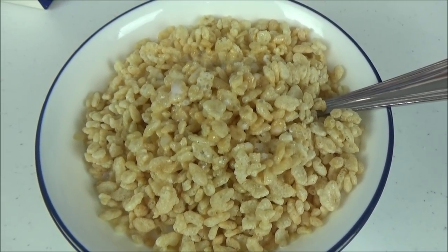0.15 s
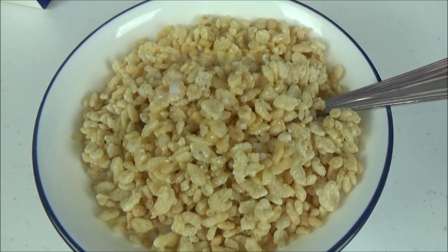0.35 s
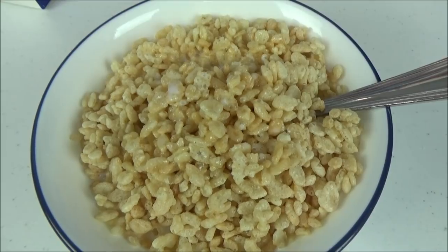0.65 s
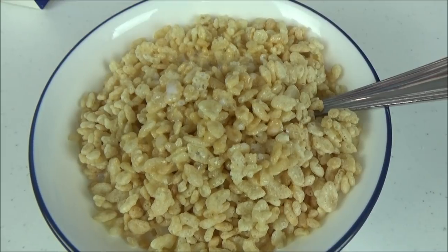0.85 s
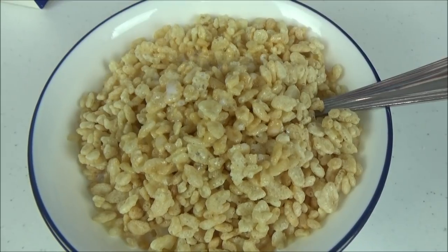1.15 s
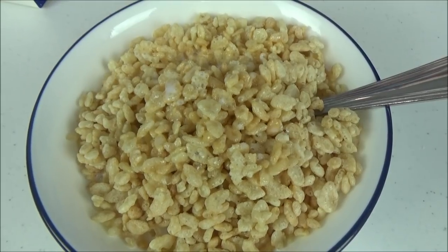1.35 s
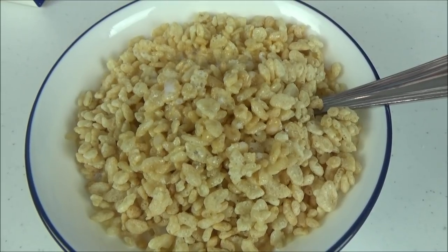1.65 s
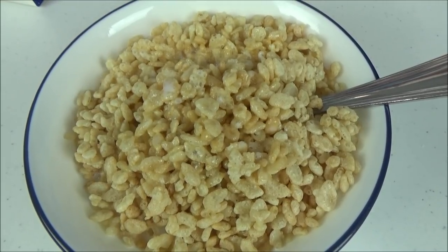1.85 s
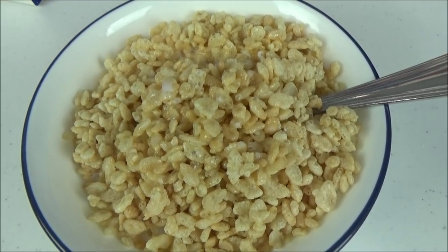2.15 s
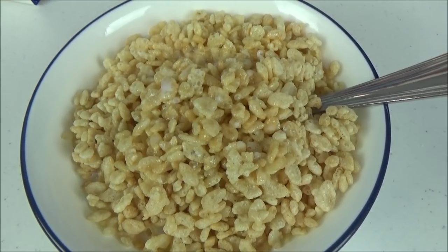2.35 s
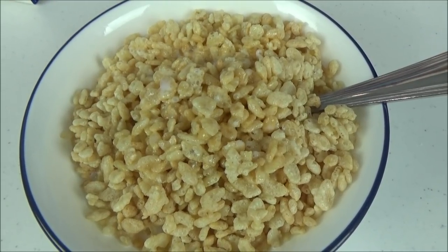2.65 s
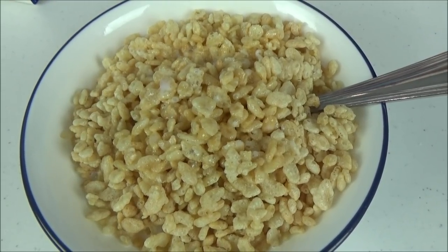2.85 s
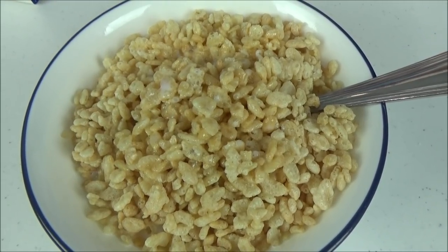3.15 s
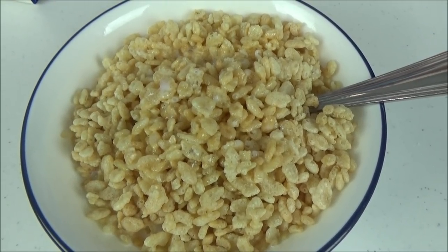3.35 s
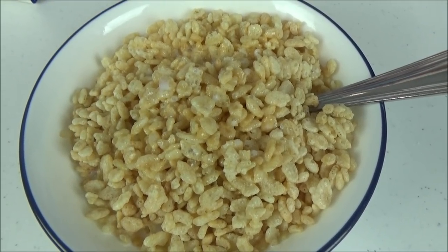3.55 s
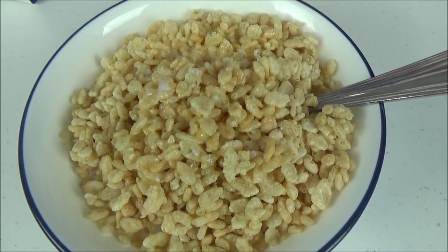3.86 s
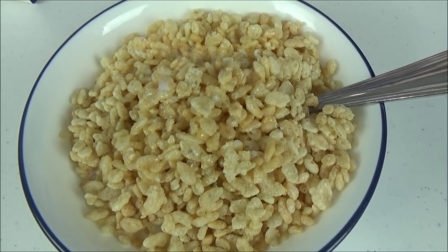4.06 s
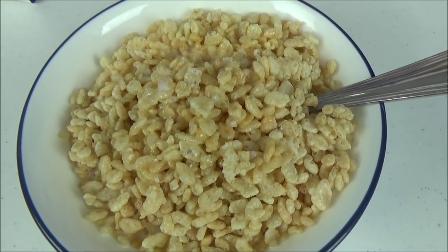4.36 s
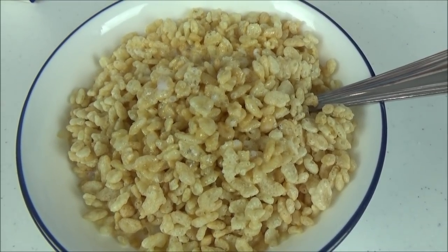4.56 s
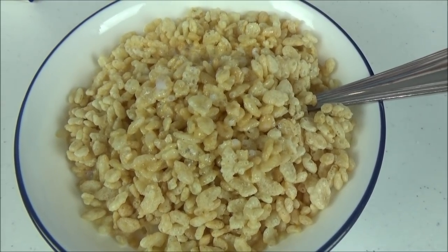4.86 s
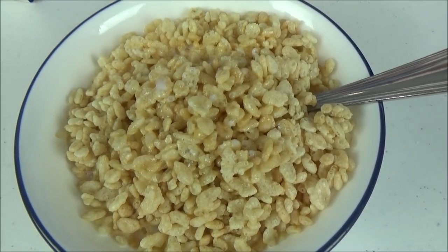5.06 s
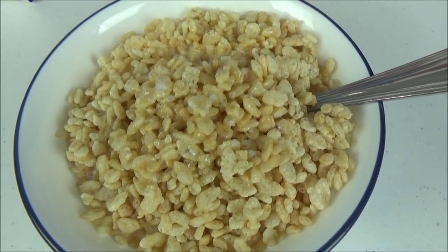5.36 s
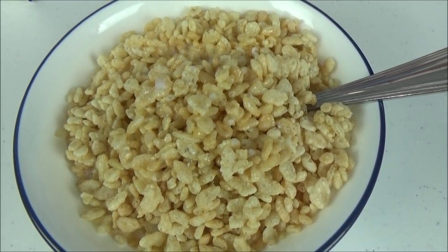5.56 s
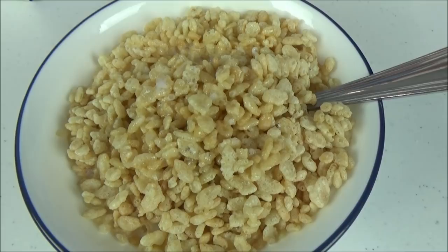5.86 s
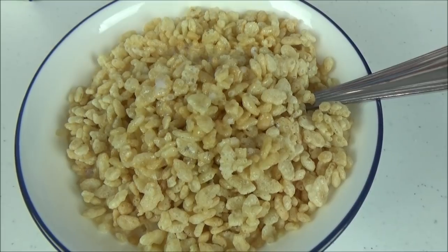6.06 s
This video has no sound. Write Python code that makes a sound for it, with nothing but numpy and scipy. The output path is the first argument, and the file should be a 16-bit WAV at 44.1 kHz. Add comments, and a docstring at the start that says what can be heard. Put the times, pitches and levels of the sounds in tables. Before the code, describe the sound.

Puffed cereal soaking in milk crackles very close by, bright irregular snaps and duller pops over a fine fizz and quiet room hum.

```python
"""A faint fizz over quiet room hum, then snaps and pops: a bowl of puffed cereal soaks in milk, close by.
Cell walls crack with bright snaps, freed air pockets give duller pops, and countless faint cracks fizz below.
A sizzle, a few ringing bubbles, a low thud and wet clunks are sums of short decaying modes or shaped noise.
Scatter spreads each crack, a wall echo and faint tail follow, and shaped noise with hum lines makes the room.
The recorder ducks at the loudest cracks and recovers slowly."""
import sys
import numpy as np
from scipy import signal
from scipy.fft import rfft, irfft
from scipy.io import wavfile
from scipy.ndimage import uniform_filter1d

SR = 44100
rng = np.random.default_rng(int(sys.argv[2]) if len(sys.argv) > 2 else 0)


def transcribe(signal):
    """Save signal, clipped to [-1, 1], as a 16-bit WAV file at the path in sys.argv[1]."""
    frames = np.atleast_2d(signal).T
    limited = np.clip(frames, -1, 1)
    pcm = np.round(limited * 32767).astype(np.int16)
    wavfile.write(sys.argv[1], SR, pcm)


N = 273111


def from_db(db):
    """Decibels to amplitude."""
    return 10 ** (np.asarray(db) / 20)


def rms_one(x):
    """Scale to an RMS of 1."""
    return x / np.sqrt(np.mean(x ** 2) + 1e-20)


def at_hz(points, hz):
    """Read a spectrum curve, straight between its points on a log frequency axis."""
    point_hz, point_db = np.transpose(points)
    return np.interp(np.log(hz + 1), np.log(point_hz), point_db)


def drift(rate_hz):
    """Random wavering with RMS 1, slow or rough by its rate: noise through two equal one-pole lowpasses."""
    r = np.exp(-2 * np.pi * rate_hz / SR)
    noise = rng.standard_normal(N + SR)
    settled = signal.lfilter([1], [1, -2 * r, r * r], noise)[SR:]
    return rms_one(settled)


def room():
    """Broad noise from rumble into hiss, wide in the middle range, with wavering hum lines."""
    # background noise spectrum, ending sharply near 16 kHz, relative: hz, level_db_per_hz
    room_curve = [(24, -10.5), (124, 1.5), (334, -4), (800, -8.5), (920, -7.5), (1370, -11), (4000, -15),
                  (9000, -15), (13000, -22), (15700, -21.5), (16200, -47)]
    # stereo width of the noise: hz, side_minus_mid_db
    width_curve = [(100, -18), (400, -4), (1100, 0.5), (8000, -7)]
    # hum lines: line_hz, centre_level_db_rms, waver_rate_hz
    hum_lines = [(59, -75.5, 4.6), (118.9, -72.5, 5.9), (335.2, -73.5, 3.8)]
    noise_db_rms = -58

    hz = np.arange(N // 2 + 1) * SR / N
    mid, side = rfft(rng.standard_normal((2, N))) * from_db(at_hz(room_curve, hz))
    mid = irfft(mid, N)
    side = irfft(side * from_db(at_hz(width_curve, hz)), N)
    sound = from_db(noise_db_rms) * rms_one(mid + side * [[1], [-1]])
    t = np.arange(N) / SR
    for line_hz, level_db, waver_hz in hum_lines:
        level = np.sqrt(2) * from_db(level_db + 2.1 * drift(waver_hz))
        sound = sound + level * np.sin(2 * np.pi * line_hz * t + 1.06 * drift(waver_hz))
    return sound


def cracks(rows, rise_ms, unlike, low_hz, count, size, scatter_db=-26.0, rise_per_ms=0, ragged=1):
    """Each crack rings a few modes of its own grain for a moment; the heap and bowl around it scatter the sound.

    rows: start_s, peak_db before echoes and ducking, centre_hz, ring_ms, spread_octaves each way.
    unlike: how far left and right scatter differ; ragged: largest random start phase in turns.
    """
    top_hz = 14040   # treble rolls off above this
    start_s, peak_db, hz, ring_ms, octaves = np.transpose(rows)
    ms = np.arange(size) * 1000 / SR

    chance = rng.random((len(start_s), 2, count))
    steps = 2 * (np.arange(count) + chance[:, 0]) / count - 1   # modes cover the spread evenly
    modes_hz = np.clip(hz[:, None] * 2 ** (octaves[:, None] * steps), 50, SR / 2.5)
    turns = modes_hz[..., None] * ms * (1 + rise_per_ms * ms) / 1000   # pitch climbs at twice rise_per_ms
    start_turns = ragged * chance[:, 1, :, None]   # a clean break starts all modes in step
    rings = np.sin(2 * np.pi * (turns + start_turns))
    wave = (rings * from_db(-7 * steps ** 2)[..., None]).sum(axis=1)   # strongest near the centre
    wave = wave * (1 - np.exp(-ms / rise_ms)) * np.exp(-ms / ring_ms[:, None])

    paths = rng.standard_normal((len(start_s), 3, size))   # one shared path, then left and right
    scatter = from_db(scatter_db - 4.36 * ms) * (ms > .2) * (paths[:, :1] + unlike * paths[:, 1:])
    # the direct sound sits a little left or right
    scatter[..., 0] = from_db(1.2 * paths[:, :1, 0] * [1, -1] / 2)
    heard = signal.fftconvolve(wave[:, None], scatter, axes=2)[..., :size]
    band = signal.butter(2, [low_hz, top_hz], "band", fs=SR, output="sos")
    heard = signal.sosfilt(band, heard)   # small things radiate no bass
    heard = heard * (from_db(peak_db) / np.abs(heard).max(axis=(1, 2)))[:, None, None]

    at = (np.round(start_s * SR).astype(int)[:, None] + np.arange(size)).ravel()
    return np.array([np.bincount(at, heard[:, side].ravel(), N + SR)[:N] for side in range(2)])


def chance_rows(count, mean_db, spread_db, top_db, hz, octaves, ring_ms, swell_db):
    """Cracks at random moments: in clumps of four, many faint, few strong, louder while the fizz swells."""
    clump_s = 0.012   # small cracks set each other off within about this time
    u, g = rng.random((count, 2)), rng.standard_normal((count, 3))
    clumps = rng.random(count // 4)[np.arange(count) % (count // 4)]
    start_s = (clumps * N / SR - clump_s * np.log(1 - u[:, 0])) % (N / SR)
    level_db = mean_db - spread_db * np.log(1 - u[:, 1]) + swell_db[(start_s * SR).astype(int)]
    pitch_hz = hz * 2 ** (octaves * g[:, 0])
    rings_ms = ring_ms * 2 ** (0.44 * g[:, 1])
    spread_octaves = 0.45 * 2 ** (0.69 * g[:, 2])
    return np.transpose([start_s, np.minimum(level_db, top_db), pitch_hz, rings_ms, spread_octaves])


def fizz():
    """Small cracks come in clumps, most of them bright, a few dull."""
    # vigour of the fizz, a base for the crack levels: time_s, level_db
    vigour = [(0.0, -55.5), (0.64, -60.5), (1.36, -59), (1.83, -59), (1.95, -59.5), (3.05, -57),
              (4.0, -62.5), (4.36, -56), (5.1, -64), (5.35, -69), (5.8, -55)]
    swell_db = np.interp(np.arange(N) / SR, *np.transpose(vigour)) + 4.5 * drift(14)
    bright = chance_rows(count=2000, mean_db=5.5, spread_db=5.0, top_db=-36.5, hz=9100, octaves=0.27,
                         ring_ms=0.4, swell_db=swell_db)
    dull = chance_rows(count=240, mean_db=11.5, spread_db=6.0, top_db=-46.5, hz=2740, octaves=0.43,
                       ring_ms=0.46, swell_db=swell_db)
    bright = cracks(bright, rise_ms=0.064, unlike=0.15, low_hz=298, count=6, size=200)
    dull = cracks(dull, rise_ms=0.11, unlike=0.35, low_hz=304, count=3, size=160)
    return bright + dull


def pops():
    """Air pockets open: duller cracks whose modes lie closer together the fainter they are."""
    # air pockets opening: start_s, peak_db, centre_hz, ring_ms
    pop_rows = [(0.0134, -40, 2150, 0.86), (0.0296, -32.5, 2200, 0.69), (0.047, -23.5, 2280, 2.2),
                (0.2497, -42, 2250, 1.3), (0.4682, -38, 2020, 0.87), (0.7455, -31, 2530, 0.32),
                (1.207, -36, 2650, 0.24), (1.459, -37.5, 1980, 0.46), (1.6414, -31, 2400, 0.35),
                (1.8585, -33, 2420, 0.94), (1.927, -32, 1860, 0.14), (2.345, -33.5, 2030, 0.36),
                (2.5794, -29, 3540, 0.11), (3.1795, -19, 1980, 0.11), (3.301, -42, 1560, 0.19),
                (3.3302, -27.5, 2500, 0.19), (3.6027, -16, 2320, 0.24), (3.708, -38, 2300, 0.37),
                (3.821, -40.5, 2030, 1), (4.1378, -34.5, 2120, 0.41), (4.4244, -28, 2120, 0.081),
                (4.516, -37.5, 2570, 0.17), (4.6216, -19.5, 2480, 0.074), (4.8751, -37.5, 2100, 0.4),
                (4.966, -29, 2350, 0.53), (5.0424, -23, 2430, 1.4), (5.1348, -37.5, 2050, 0.34),
                (5.808, -30, 2310, 0.9), (6.0874, -41.5, 3970, 0.5)]
    octaves, doubles_db = 0.6, 22   # mode spread of a 0 dB pop; it doubles per this many dB
    rows = [(s, db, hz, ring, octaves * 2 ** (db / doubles_db)) for s, db, hz, ring in pop_rows]
    return cracks(rows, rise_ms=0.14, unlike=1.13, low_hz=278, count=14, size=800, ragged=0.25)


def snaps():
    """Cell walls break: bright, near-clean cracks that tend to ring longer when fainter."""
    # loud cracks of cell walls: start_s, peak_db, centre_hz
    snap_rows = [(0.0292, -32, 8150), (0.047, -1.5, 8150), (0.284, -18, 9650), (0.294, -18.5, 9300),
                 (0.3458, -26.5, 10800), (0.397, -29, 6200), (0.46, -18.5, 7080), (0.4675, -30.5, 6700),
                 (0.8476, -25, 9200), (0.896, -34, 8630), (0.9063, -30.5, 7200), (1.074, -31.5, 8280),
                 (1.0793, -34.5, 8050), (1.207, -19, 8200), (1.2405, -26.5, 8100), (1.328, -24.5, 10700),
                 (1.3545, -26, 9000), (1.3589, -17.5, 10160), (1.3722, -21, 7200), (1.452, -22.5, 8750),
                 (1.4593, -21.5, 5170), (1.633, -23.5, 9500), (1.6405, -25, 6630), (1.666, -23, 9000),
                 (1.6896, -37, 8830), (1.7744, -37, 9050), (1.838, -28, 8100), (1.8595, 1, 9700),
                 (1.9879, -23, 8070), (2.1938, -30, 11100), (2.257, -16, 9400), (2.5179, -25.5, 10600),
                 (2.579, -26.5, 6100), (2.6457, -24, 10400), (2.6867, -31.5, 6900), (2.938, -23, 8950),
                 (2.956, -28, 7600), (3.0567, -28, 5870), (3.0686, -28.5, 7300), (3.083, -27, 7900),
                 (3.1808, -22.5, 7000), (3.2642, -27.5, 8600), (3.378, -26, 7300), (3.421, -20, 7400),
                 (3.4325, -23.5, 9500), (3.583, -23.5, 6630), (3.6026, -6, 9100), (3.676, -20, 8740),
                 (3.6874, -26, 8400), (3.8209, -30, 6100), (3.841, -28.5, 8500), (3.9378, -18.5, 11700),
                 (4.1671, -27, 8300), (4.2047, -25.5, 10600), (4.244, -19, 9200), (4.266, -26.5, 8340),
                 (4.2848, -21, 8100), (4.4074, -38, 7360), (4.4247, -8.5, 11240), (4.435, -26, 10200),
                 (4.4505, -24, 7160), (4.6216, -14.5, 10350), (4.6806, -20.5, 7100), (4.7846, -26.5, 8250),
                 (4.814, -33.5, 8900), (4.877, -31, 7840), (4.898, -30.5, 7160), (4.966, -1, 9740),
                 (5.0132, -29.5, 11400), (5.0424, -7.5, 7900), (5.1103, -28, 8700), (5.1351, -27.5, 8000),
                 (5.1927, -28, 9000), (5.372, -30, 10200), (5.4528, -29.5, 6560), (5.4944, -31, 9700),
                 (5.558, -25.5, 8630), (5.6518, -20.5, 9400), (5.6993, -26.5, 7460), (5.808, -7.5, 8750),
                 (5.8747, -26, 8180), (5.9763, -29.5, 7100), (5.989, -35, 9540), (6.008, -27.5, 8100),
                 (6.179, -15, 8550)]
    ring_ms, halves_db = 0.17, 60   # typical ring of a 0 dB snap; it halves per this many dB upward
    octaves, ring_scatter = 0.2, 0.3   # spread of modes; chance in the ring, in doublings
    peak_db = np.array(snap_rows)[:, 1]
    doublings = ring_scatter * rng.standard_normal(len(snap_rows)) - peak_db / halves_db
    rows = [(*row, ring, octaves) for row, ring in zip(snap_rows, ring_ms * 2 ** doublings)]
    return cracks(rows, rise_ms=0.026, unlike=0.86, low_hz=3120, count=10, size=400, ragged=0.085)


def sizzle():
    """Air escapes from one grain: a short rough hiss that swells and fades."""
    # hiss band: its low and high edge [Hz]
    band_hz = [7600, 10200]
    start_s, length_s, level_db = 0.789, 0.09, -52.5   # level before swell and roughness
    phase = np.clip((np.arange(N) / SR - start_s) / length_s, 0, 1)
    band = signal.butter(2, band_hz, "band", fs=SR, output="sos")
    hiss = rms_one(signal.sosfilt(band, rng.standard_normal(N)))
    return from_db(level_db + 4.8 * drift(160)) * np.sin(np.pi * phase) * hiss


def bubbles():
    """Each bubble rings on one note that climbs slightly as it dies away."""
    # ringing bubbles: start_s, peak_db, start_hz, ring_ms
    bubble_rows = [(1.051, -27.5, 2930, 1.6), (2.698, -31.5, 2090, 1.2), (2.9463, -35, 1780, 1.2),
                   (5.558, -37, 1830, 0.82), (6.0873, -41.5, 2100, 3.5)]
    return cracks([(*row, 0) for row in bubble_rows], rise_ms=0.16, unlike=1, low_hz=300, count=1,
                  size=800, scatter_db=-23.0, rise_per_ms=0.0067)


def thud():
    """A faint low knock: two slow-starting modes."""
    # modes of the knock: start_s, peak_db, mode_hz, ring_ms
    thud_rows = [(4.0374, -42.5, 232, 13), (4.0385, -51.5, 132, 12)]
    return cracks([(*row, 0) for row in thud_rows], rise_ms=2.4, unlike=0.27, low_hz=62.7, count=1,
                  size=3000, ragged=0)


def clunks():
    """Dull wet knocks excite the bowl's modes, wide in the stereo field."""
    # knocks on the bowl: start_s, level_db added to every mode
    clunk_rows = [(4.759, -31), (4.8868, -42)]
    # bowl modes under the milk: mode_hz, relative_peak_db, ring_ms
    bowl_modes = [(407, -13.5, 2.4), (730, -7, 4.6), (1000, -3, 4.1), (1287, 1.5, 3.9), (1720, 1, 2.4),
                  (2230, -3.5, 1.7), (3520, -2, 0.48)]
    rows = [(s, db + mode_db, hz, ring, 0) for s, db in clunk_rows for hz, mode_db, ring in bowl_modes]
    return cracks(rows, rise_ms=0.11, unlike=3.3, low_hz=302, count=1, size=1200, ragged=0.41)


def echo_and_tail(x):
    """The direct sound, a smeared wall echo and a faint decaying noise tail, partly different on each side."""
    # wall echo: delay_ms, level_db at the centre of its noise burst
    echo_rows = [(8.76, -38)]
    wall_cut_hz = 9900   # the tail is duller than the crack
    ms = np.arange(SR // 3) * 1000 / SR
    shared, own = rng.standard_normal(len(ms)), rng.standard_normal((2, len(ms)))
    response = from_db(-49.0 - 0.21 * ms) * (ms > 3.0) * (shared + 0.6 * own)
    response = signal.lfilter(*signal.butter(2, wall_cut_hz, fs=SR), response)
    response[:, 0] = 1   # direct sound
    for delay_ms, level_db in echo_rows:   # smeared over a fraction of a ms
        response += from_db(level_db - 15.0 * np.abs(ms - delay_ms)) * (shared + 0.14 * own)
    return signal.fftconvolve(x, response, axes=1)[:, :N]


def scene():
    """Cereal with its echo and tail, over the thud and room noise."""
    grains = fizz() + pops() + snaps() + sizzle() + bubbles() + clunks()
    return room() + echo_and_tail(grains) + thud()


def record(dry):
    """A peak over the ceiling pulls the gain down, gliding in just ahead; it creeps back and the top is cut."""
    ceiling_db, recovery_db_per_s = -6.5, 2
    half_glide_ms, cutoff_hz = 0.55, 17162   # cutoff is where the lowpass reaches 60 dB down
    climb = recovery_db_per_s * np.arange(N) / SR
    over = 20 * np.log10(np.abs(dry).max(axis=0) + 1e-9) - ceiling_db
    duck_db = np.maximum(np.maximum.accumulate(over + climb) - climb, 0)
    ahead = int(half_glide_ms * SR / 1000) + 1
    # the averaging window looks only forward
    duck_db = uniform_filter1d(duck_db, 2 * ahead, origin=-ahead, mode="nearest")
    lowpass = signal.cheby2(12, 60, cutoff_hz, fs=SR, output="sos")
    return signal.sosfilt(lowpass, dry * from_db(-duck_db))


dry = scene()
out = record(dry)
transcribe(out)
```